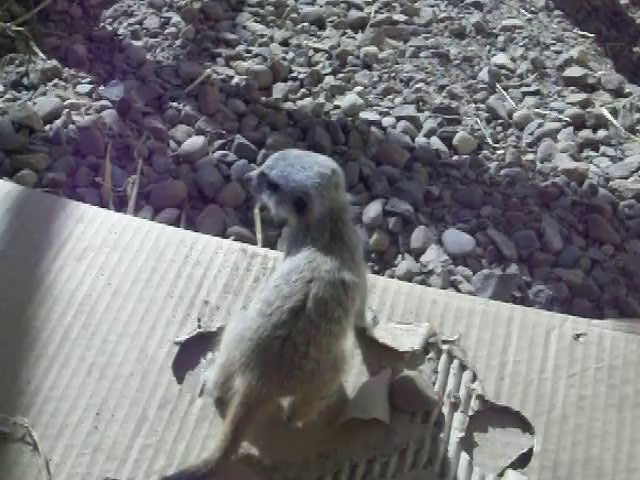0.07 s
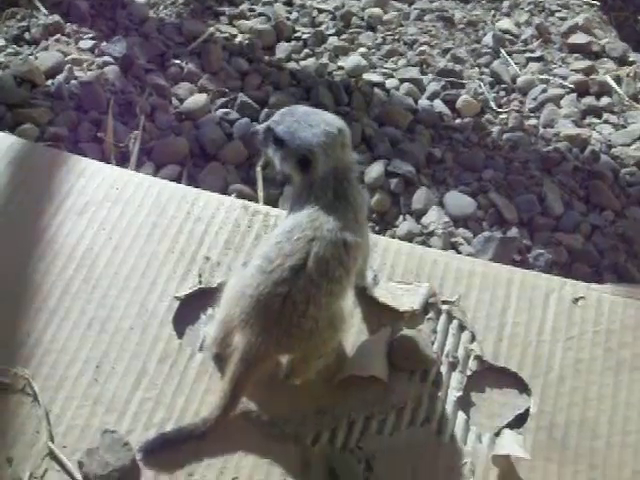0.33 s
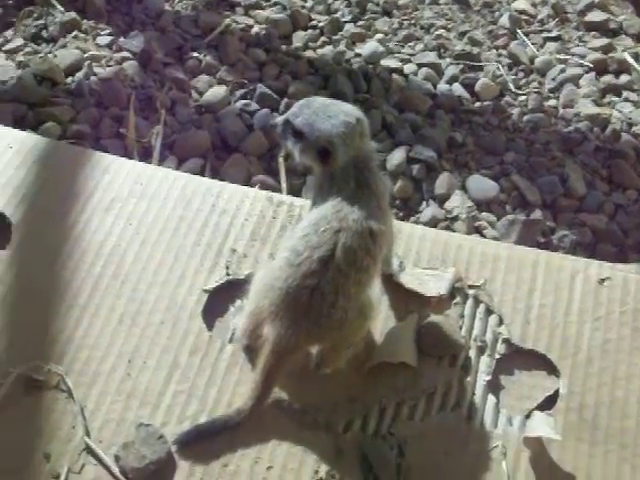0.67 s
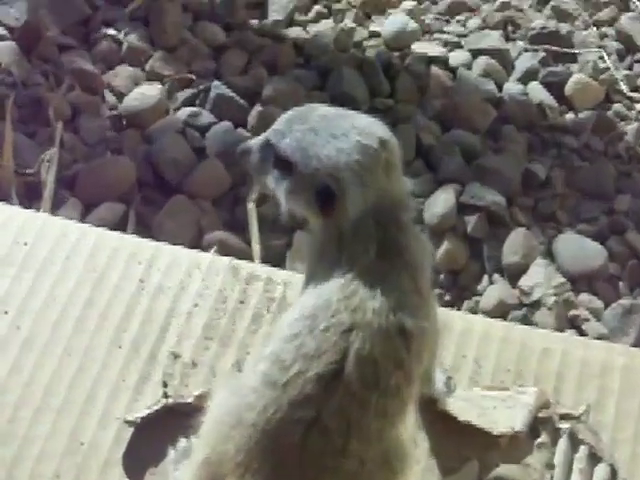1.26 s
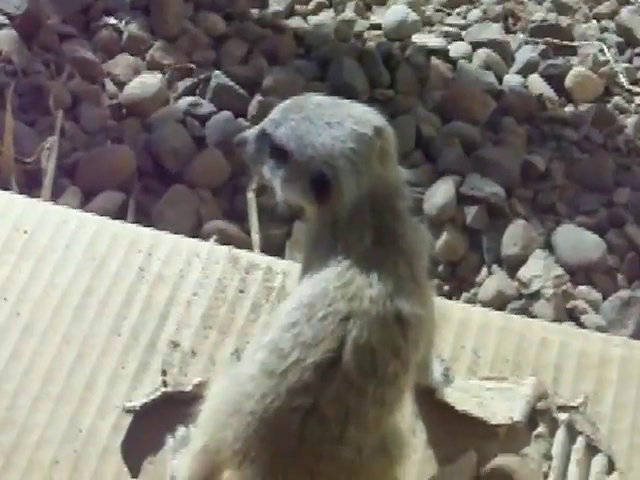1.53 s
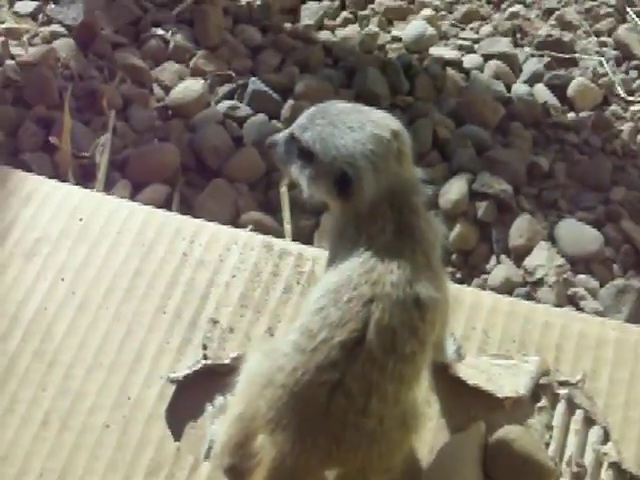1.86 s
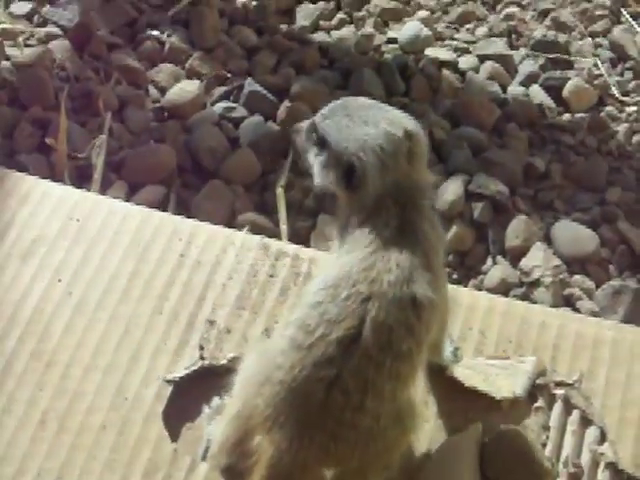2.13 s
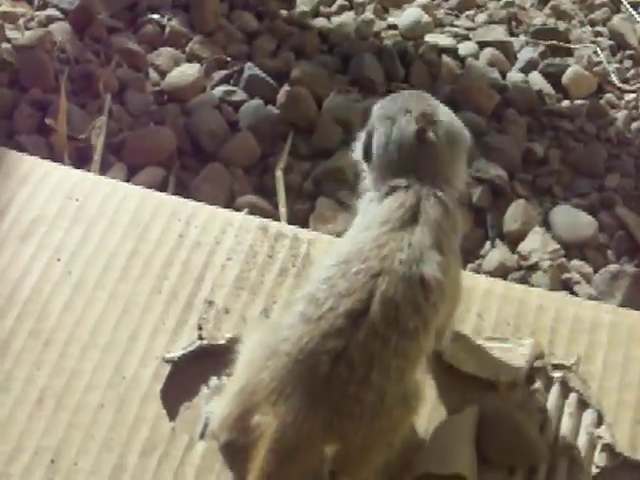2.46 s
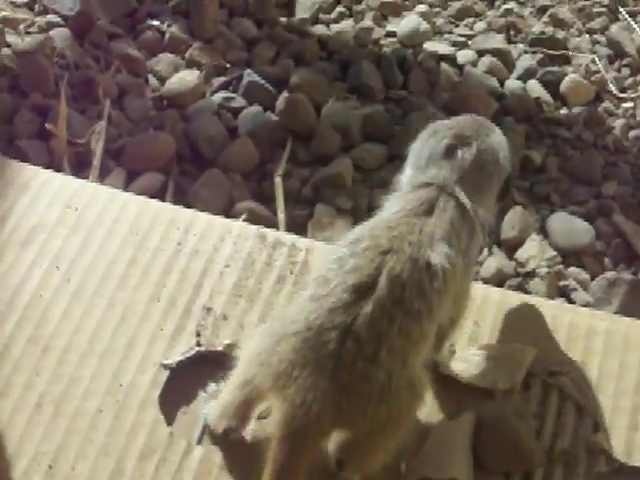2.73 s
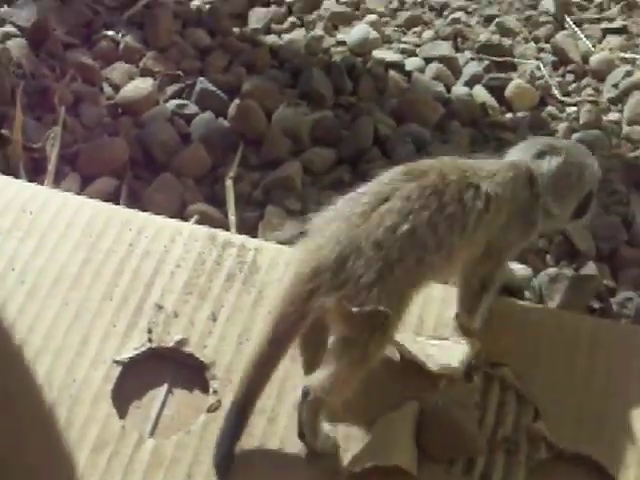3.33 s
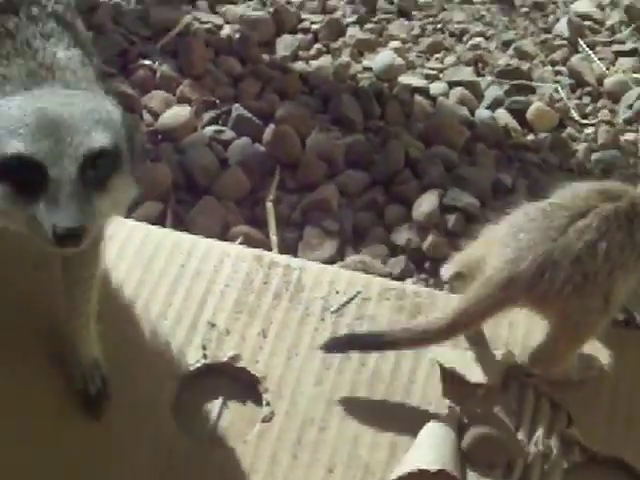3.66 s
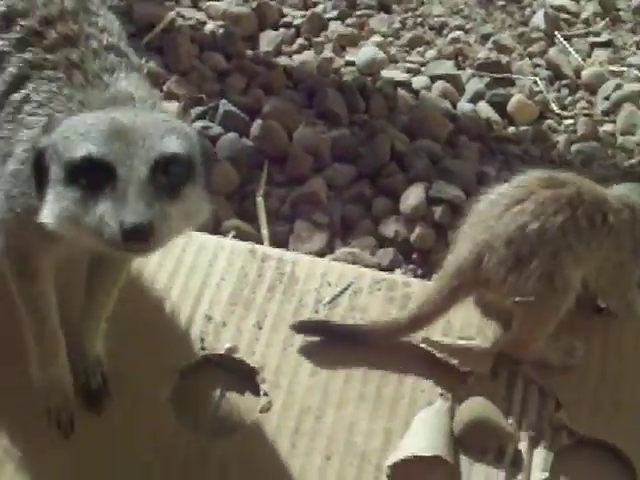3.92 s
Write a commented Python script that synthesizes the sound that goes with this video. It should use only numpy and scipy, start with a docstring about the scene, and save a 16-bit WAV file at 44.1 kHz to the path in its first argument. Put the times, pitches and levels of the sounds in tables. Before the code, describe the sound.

After a low pop, a young meerkat repeats a drawn-out, rasping, hissy call four times outdoors. Its paws knock and scratch on cardboard in between, with fainter pups farther off and soft wind on a dull-sounding microphone.

```python
"""A meerkat pup begs with four hoarse calls, each a quick rise and a long sag in pitch.
Its throat shapes a rasping tone, and its breath adds hiss, screech and sizzle. Other pups call faintly.
Paws tap and scuff a sheet of cardboard over gravel, and light wind rumbles on the microphone.
After a brief silence, the sound starts abruptly with a low pop. It has little treble."""
import sys
import numpy as np
from scipy.fft import rfft, irfft, next_fast_len
from scipy.io import wavfile
from scipy.ndimage import map_coordinates

SR = 44100
rng = np.random.default_rng(int(sys.argv[2]) if len(sys.argv) > 2 else 0)


def inscribe(sig):
    """Save sig as 16-bit PCM at rate SR to the path in sys.argv[1].

    A 1-D sig is mono; a 2-D sig holds one channel per row.
    Samples are clipped to [-1, 1] before scaling.
    """
    pcm = np.round(np.clip(np.atleast_2d(sig).T, -1, 1) * 32767)
    wavfile.write(sys.argv[1], SR, pcm.astype(np.int16))


N = 176400


def amp(db):
    """Turn decibels into a gain."""
    return 10 ** (np.asarray(db) / 20)


def unit(x):
    """Scale to an average (rms) level of 1."""
    return x / np.sqrt(np.mean(x ** 2) + 1e-20)


def gain_at(spectrum, hz):
    """Read a gain off a curve of (frequency_hz, level_db) points."""
    points_hz, db = np.transpose(spectrum)
    return amp(np.interp(np.log(hz + 1), np.log(points_hz + 1), db))


def wobble(rate, size):
    """A smooth random curve with rate changes a second."""
    return map_coordinates(rng.standard_normal(8192), [np.arange(size) * rate / SR], mode="wrap")


def flutter(rate, size):
    """Random swings in a tone's strength and phase."""
    return (unit(wobble(rate, size)) + 1j * unit(wobble(rate, size))) / np.sqrt(2)


def filtered(x, response):
    """Scale each frequency in x by response(hz)."""
    padded = next_fast_len(len(x) + 8192)
    return irfft(rfft(x, padded) * response(np.fft.rfftfreq(padded, 1 / SR)), padded)[:len(x)]


def noise(spectrum, size):
    """Noise with the given tone colour."""
    return unit(filtered(rng.standard_normal(size), lambda hz: gain_at(spectrum, hz)))


def add(out, start_s, x):
    """Mix x into out at start_s."""
    i = round(start_s * SR)
    out[i:i + len(x)] += x[:max(N - i, 0)]


def fade(t, start_s, end_s, in_s, out_s):
    """Fade in from start_s and out towards end_s."""
    opening = np.sin(np.pi / 2 * np.clip((t - start_s) / in_s, 0, 1))
    return opening * np.sin(np.pi / 2 * np.clip((end_s - t) / out_s, 0, 1))


# Tone colour of the open air: frequency_hz, level_db
AIR_COLOUR = [(150, 4), (260, -6), (420, -2.5), (650, 1.5), (880, 4.5), (1150, -1.5), (1500, -8.5),
              (2100, -16.5), (3000, -15.5), (4100, -15.5), (5200, -26), (6000, -35.5)]
# Tone colour of the wind: frequency_hz, level_db
WIND_COLOUR = [(8, -13.5), (28, 0.5), (45, -4), (65, -7.5), (95, -13.5), (150, -17.5), (260, -30),
               (600, -52)]


def wind():
    """The open air gives a soft wash, and gusts rumble on the microphone."""
    wash = amp(-37.5 - 1.5 * wobble(14, N)) * noise(AIR_COLOUR, N)
    rumble = amp(-28.5 + 2 * wobble(8.9, N)) * noise(WIND_COLOUR, N)
    return wash + rumble


def ring(tones, t, attack_s):
    """A struck sheet rings with dying tones, a little different each time."""
    out = np.zeros(len(t))
    for k, (hz, db, ring_s) in enumerate(tones):
        level = amp(db + rng.normal(0, 2.1) - 60 * t / ring_s)
        pitch_hz = hz * (1 + rng.normal(0, 0.032))
        out += (-1) ** k * level * np.sin(2 * np.pi * pitch_hz * t)
    return out * (1 - np.exp(-t / attack_s))


# Low tones of a paw's thump: pitch_hz, level_db, ring_s (time to fall by 60 dB)
THUMP_TONES = [(130, -3, 0.028), (233, -6, 0.033), (322.4, -6.5, 0.056), (468, -12.5, 0.055)]
# Tones of the cardboard: pitch_hz, level_db, ring_s
CARDBOARD_TONES = [(540, -3, 0.018), (703, 1, 0.018), (935, 0.5, 0.019), (1203, -4, 0.022),
                   (1480, -2, 0.022)]
# Tone colour of a claw's crack: frequency_hz, level_db
CLAW_COLOUR = [(300, -16.5), (1000, -8.5), (1700, -2.5), (2150, 3), (2600, 4.5), (3300, -6), (3850, 3.5),
               (4600, -7.5), (5500, -8), (6500, -9.5)]
# Taps, with levels before mixing: start_s, thump_db, knock_db, crack_db, crack_tilt_db_per_octave
PAW_TAPS = [(.143, -42, -28, -24.5, 0), (0.2423, -27.5, -2.5, 2, -1), (.509, -29, -18.5, -28, 4),
            (0.6222, -15.5, -5.5, -5, 11), (1.132, -12.5, -18, -19.5, 1), (1.162, -20, -17.5, 4.5, 4.5),
            (1.7036, -13, -4, 0.5, 7), (1.763, -26, -27, -40, -8), (1.845, -25, -29, -48, 5),
            (1.891, -8.5, -14, -36, 7), (2.549, -15, -29, -37, -1), (2.695, -38, -32, -34, 5),
            (3.11, -15, -35, -27, -10), (3.199, -52, -23, -22.5, -1.5), (3.757, -30, -25, -20.5, 0),
            (3.7826, -42.5, -8, -18, -2), (3.807, -53, -23.5, -27, -3)]


def paw_taps():
    """A paw lands with a soft thump, the sheet knocks and a claw cracks."""
    out, t = np.zeros(N), np.arange(SR // 8) / SR
    snap, tail = amp(-60 * t / 0.013), amp(-27.5 - 60 * t / 0.042)
    crack_shape = (snap + tail) * (1 - np.exp(-t / 0.0001))
    for start_s, thump_db, knock_db, crack_db, tilt in PAW_TAPS:
        colour = [(hz, db + tilt * np.log2(hz / 2500)) for hz, db in CLAW_COLOUR]
        crack = amp(crack_db) * noise(colour, len(t)) * crack_shape
        thump = amp(thump_db) * ring(THUMP_TONES, t, attack_s=0.0011)
        knock = amp(knock_db) * ring(CARDBOARD_TONES, t, attack_s=0.00011)
        add(out, start_s, thump + 0.5 * (knock + crack))
    return out


# How the throat boosts or softens each frequency: frequency_hz, level_db
THROAT_COLOUR = [(500, -6), (700, -3.5), (900, 0.5), (1300, -5.5), (1650, -12.5), (1950, -22.5),
                 (2400, -21), (2900, -6.5), (3250, -15.5), (3850, -1.5), (4400, -17.5), (5000, -14.5),
                 (5700, -21)]
# Moments when the voice's main tone breaks up: centre_s, half_length_s, added_rasp
VOICE_BREAKS = [(0.352, 0.045, 0.4), (1.318, 0.041, 0.17), (2.068, 0.012, 0.74), (2.236, 0.022, 0.68),
                (2.947, 0.019, 1.84)]


def throat_tone(clock, pitch_hz, phase, effort, octave_db, overtones_db):
    """A fairly clean main tone and rasping overtones; the higher ones need full effort."""
    breaks = sum(rasp * np.exp(-((clock - s) / half_s) ** 2) for s, half_s, rasp in VOICE_BREAKS)
    tone = np.zeros(len(clock))
    for k in range(1, 9):
        rasp, added_rasp = (0.42, breaks) if k == 1 else (1.2, 0)
        weight = 1 if k == 1 else amp(octave_db) if k == 2 else effort * amp(overtones_db)
        shake = (1 + (rasp + added_rasp) * flutter(420, len(clock))) / np.hypot(1, rasp)
        tone += gain_at(THROAT_COLOUR, k * pitch_hz) * weight * np.real(shake * np.exp(1j * k * phase))
    return tone


def nasal_ring(pitch_hz, phase, centre_hz=2970, width_hz=240):
    """The overtone at three times the pitch rings as it crosses a nasal resonance."""
    closeness = np.exp(-((3 * pitch_hz - centre_hz) / width_hz) ** 2)
    shake = 1 + 0.76 * flutter(420, len(phase))
    return amp(-12.5) * closeness * np.real(shake * np.exp(3j * phase))


def voice_crack(clock, phase, centre_s=2.24, half_length_s=0.073, pitch_ratio=0.62):
    """The near pup's third call cracks into a lower tone."""
    swell = np.exp(-((clock - centre_s) / half_length_s) ** 2)
    return amp(-5) * swell * (1 + 0.9 * wobble(130, len(clock))) * np.sin(pitch_ratio * phase)


def mouth_screech(t, length_s, pitch_hz):
    """Swirling air in the mouth makes a screech that follows the pitch and swells late in the call."""
    centre_hz = 4350 + 2.7 * (pitch_hz - 890)
    phase = 2 * np.pi * np.cumsum(centre_hz) / SR
    swell = fade(t, max(length_s - 0.29, 0), length_s, in_s=0.21, out_s=0.094)
    return swell * np.real(flutter(600, len(t)) * np.exp(1j * phase))


# Tone colour of the throat's hiss: frequency_hz, level_db
HISS_COLOUR = [(200, -20), (600, -2.5), (1000, 8), (1500, -1), (2000, -10.5), (2800, 6.5), (3300, -4.5),
               (3850, 13.5), (4400, -11), (5100, -1), (5600, -6.5), (6000, -3.5)]
# Tone colour of the bright sizzle: frequency_hz, level_db
SIZZLE_COLOUR = [(3000, -26), (3600, -10.5), (3900, -9), (4300, -9.5), (4750, 8), (5200, -1), (5600, 5.5),
                 (6000, -13)]


def call(start_s, rise_s, length_s, top_hz, end_hz, fall_curve,
         voice_db, octave_db, nasal_db, overtones_db, hiss_db, screech_db, sizzle_db):
    """One hoarse call rises and sags; near the top of its pitch it suddenly starts to sizzle."""
    t = np.arange(SR // 2) / SR
    clock, size = start_s + t, len(t)
    start_hz, jitter = 610.7, 0.012
    rise = np.sin(np.pi / 2 * np.clip(t / rise_s, 0, 1)) ** 1.8
    fall = np.clip((t - rise_s) / (length_s - rise_s), 0, 1) ** fall_curve
    pitch_hz = start_hz + (top_hz - start_hz) * rise - (top_hz - end_hz) * fall
    phase = 2 * np.pi * np.cumsum(pitch_hz * (1 + jitter * wobble(280, size))) / SR
    effort = fade(t, 0.012, length_s, in_s=0.099, out_s=0.21)
    voice = throat_tone(clock, pitch_hz, phase, effort, octave_db, overtones_db)
    voice += amp(nasal_db) * effort * nasal_ring(pitch_hz, phase)
    voice += voice_crack(clock, phase)
    voice *= amp(voice_db) * fade(t, 0, length_s, in_s=0.02, out_s=0.056)
    hiss = noise(HISS_COLOUR, size) * amp(hiss_db + 4.5 * wobble(130, size)) * effort
    screech = amp(screech_db) * mouth_screech(t, length_s, pitch_hz)
    sizzle = amp(sizzle_db) * noise(SIZZLE_COLOUR, size)
    sizzle *= fade(t, 0.7 * rise_s, length_s, in_s=0.023, out_s=0.26)
    pulses = 1 + 0.5 * np.cos(phase)  # the noise pulses in step with the voice
    return np.sqrt(2) * (voice + screech) + pulses * (hiss + sizzle)


# The near pup's calls, with levels before mixing: start_s, rise_s, length_s, top_hz, end_hz,
# fall_curve, voice_db, octave_db, nasal_db, overtones_db, hiss_db, screech_db, sizzle_db
NEAR_CALLS = [(0.286, .105, 0.42, 889.5, 648.2, 1.6, -33, -2, 6, 0.5, -39, -44, -39.5),
              (1.259, 0.11, 0.38, 890, 650.6, 1.46, -34, -1, 2, -6, -45.5, -42.5, -41),
              (2.029, .112, .425, 969, 638, 2.1, -34.5, -0.5, 5.5, -7.5, -46.5, -37, -42.5),
              (2.899, .1, 0.3, 890, 698, 1.22, -35.5, 3.5, -3, -8.5, -45, -38.5, -46.5)]
# Calls of the pups farther off: same columns
FAR_CALLS = [(.62, .1, .24, 1041, 835, 1.4, -42, -9, -16, -6, -62, -57.5, -72),
             (1.6, .08, 0.18, 770, 645, 1.54, -36.5, 1, -30, -29, -67, -79, -73),
             (2.36, 0.064, 0.14, 1050, 814, 1, -48, 2, -7, -13.5, -67, -70, -68),
             (3.72, .1, 0.18, 856, 760, 1.3, -43.5, 1, -4, 2, -66, -59, -71),
             (3.91, 0.086, 0.28, 784, 726, 0.84, -44.5, 8, -14, -9, -78, -48, -67)]


def pups():
    """One pup begs close by while others call more faintly."""
    out = np.zeros(N)
    for start_s, *shape in NEAR_CALLS + FAR_CALLS:
        add(out, start_s, call(start_s, *shape))
    return out


# Drags of the claws: centre_s, half_length_s, level_db
CLAW_DRAGS = [(1.183, 0.016, -26), (3.204, 0.0063, -31.5), (3.353, 0.17, -43), (3.793, 0.035, -34)]
# Tone colour of scraped cardboard: frequency_hz, level_db
SCRAPE_COLOUR = [(400, 5.5), (1200, -3.5), (2000, -10.5), (2800, 2.5), (3600, -2), (5000, -14),
                 (6000, -23.5)]


def claw_scuffs():
    """Claws drag over the cardboard with a grainy noise."""
    t = np.arange(N) / SR
    drags = sum(amp(db) * np.exp(-((t - s) / half_s) ** 2) for s, half_s, db in CLAW_DRAGS)
    return drags * unit(noise(SCRAPE_COLOUR, N) * amp(5.3 * wobble(220, N)))


def scene():
    """Everything that reaches the microphone, in one channel."""
    return (pups() + paw_taps() + claw_scuffs() + wind())[None]


# How the treble falls away: frequency_hz, level_db
TREBLE_LOSS = [(5300, 0.5), (5700, -8.5), (6100, -18.5)]


def record(dry):
    """The sound starts with a low pop and keeps little treble; the hardest taps clip with a crackle."""
    start_s, pop_decay_s, clip_level = 0.072, 0.34, amp(-2.5)
    t = np.arange(N) / SR - start_s
    dull = filtered(dry[0], lambda hz: gain_at(TREBLE_LOSS, hz))
    dull = filtered(dull, lambda hz: 1 / (1 + (hz / 6150) ** 80))  # a steep treble cut
    pop = -amp(-9) * np.exp(-np.abs(t) / pop_decay_s)
    clipped = np.clip((t > 0) * (dull + pop), -clip_level, clip_level)
    return filtered(clipped, lambda hz: hz < 16600)[None]


dry = scene()
out = record(dry)
inscribe(out)
```